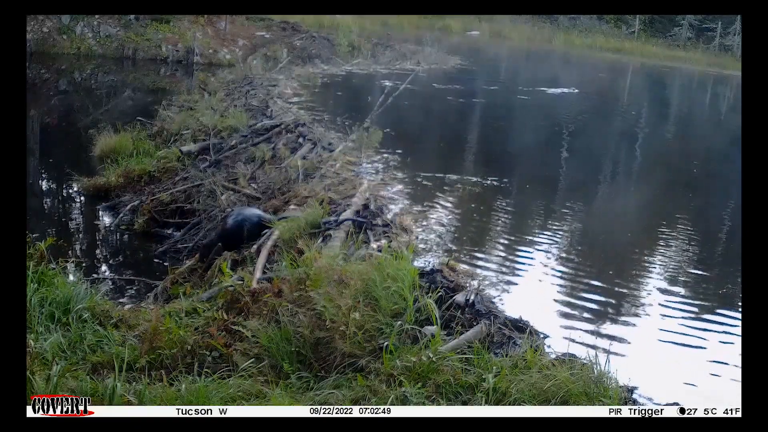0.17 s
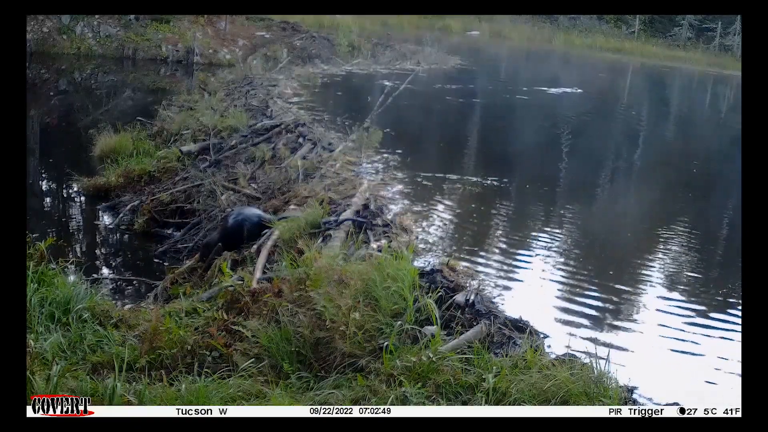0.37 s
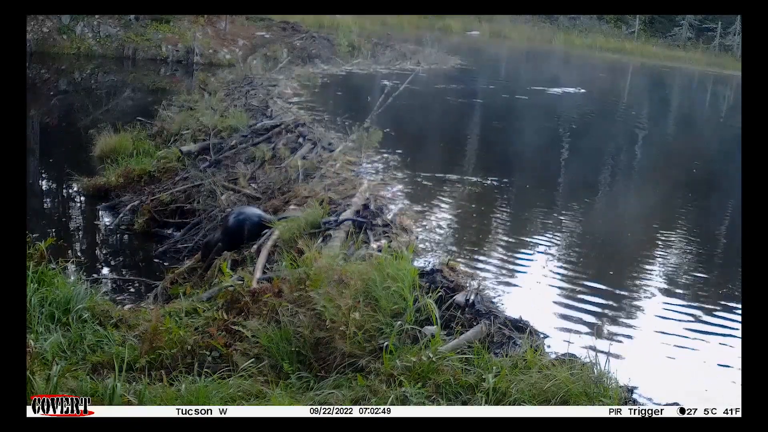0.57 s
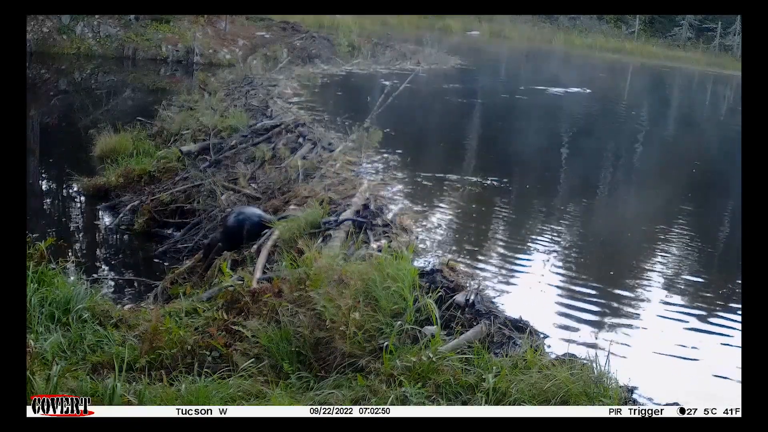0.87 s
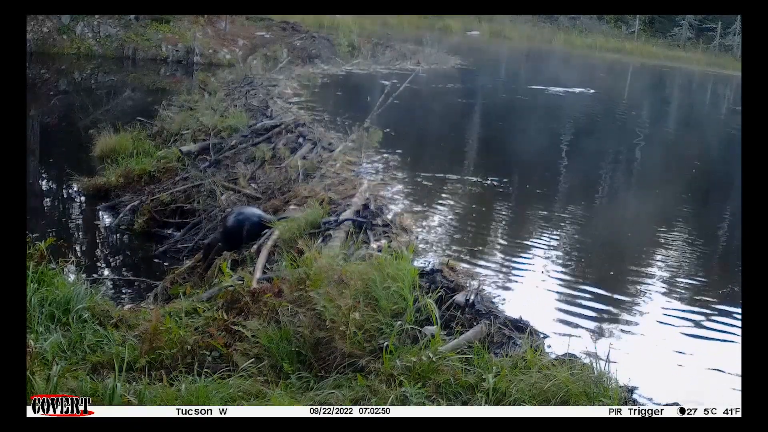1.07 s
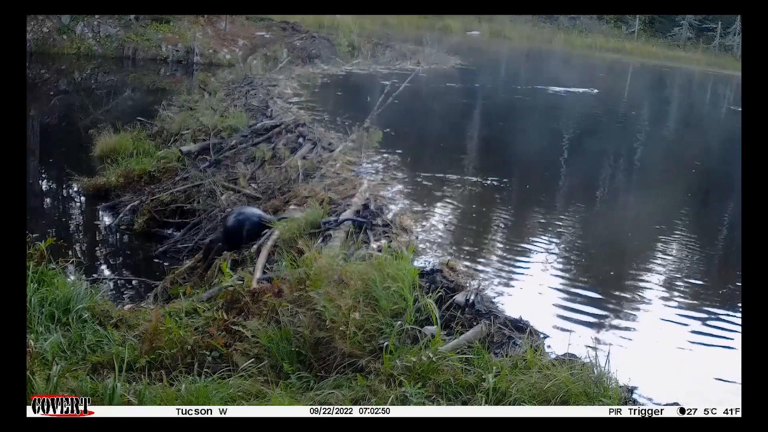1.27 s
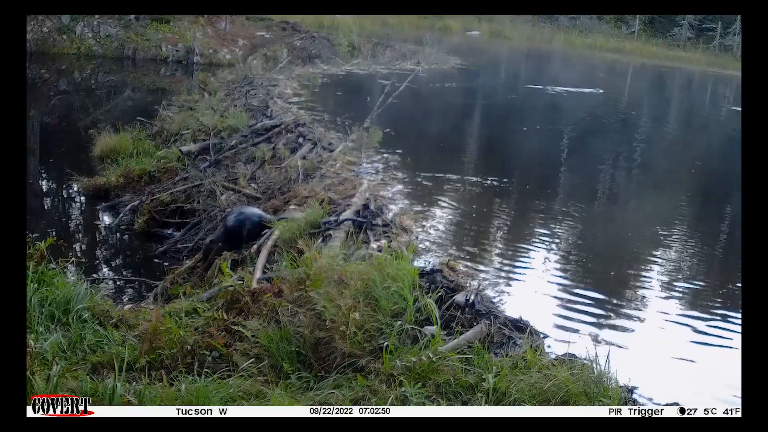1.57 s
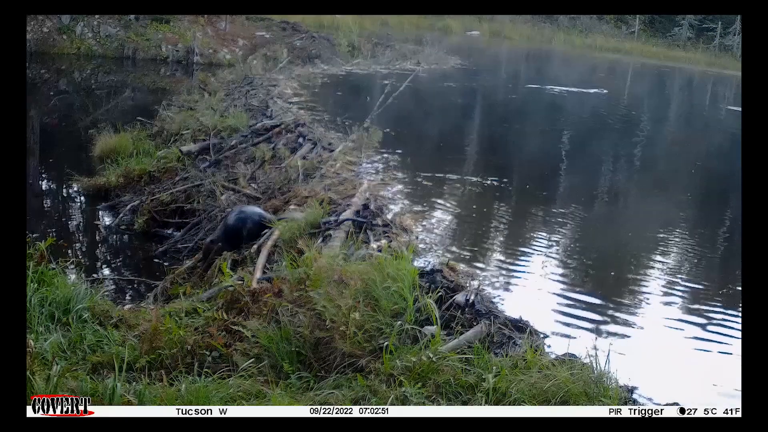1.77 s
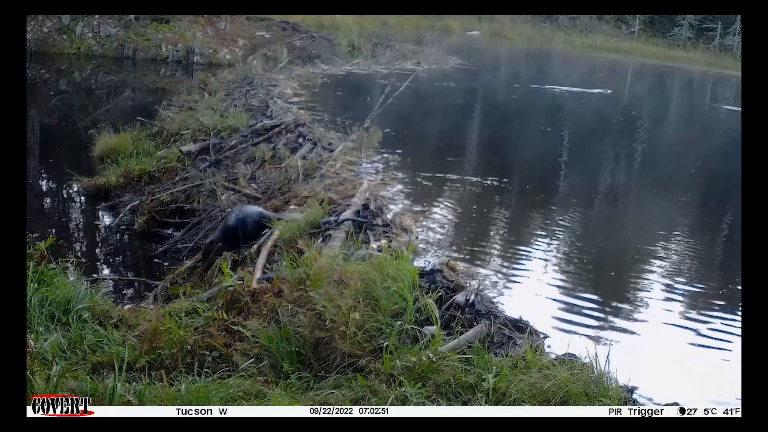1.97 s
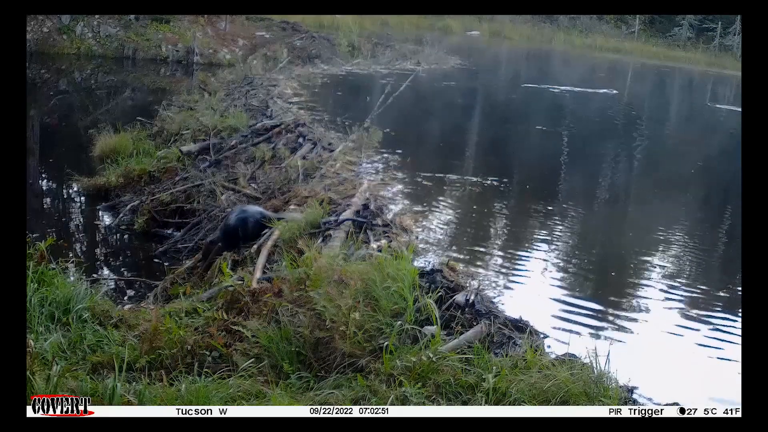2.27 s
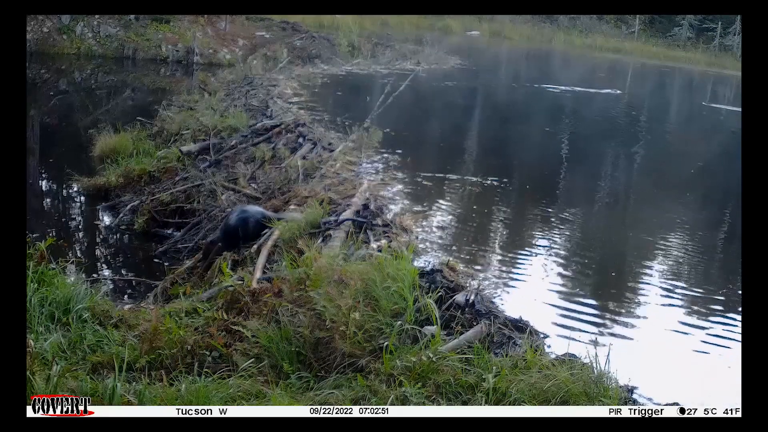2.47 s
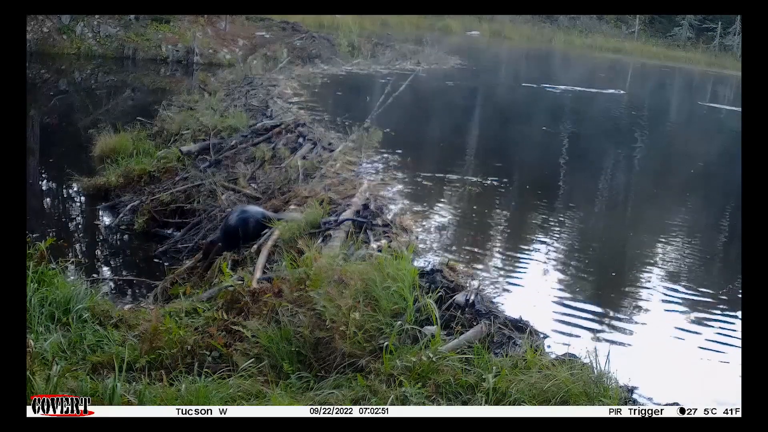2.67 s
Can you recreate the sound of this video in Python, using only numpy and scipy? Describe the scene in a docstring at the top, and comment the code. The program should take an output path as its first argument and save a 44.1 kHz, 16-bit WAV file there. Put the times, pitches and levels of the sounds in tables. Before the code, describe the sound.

Outdoor pond, fixed microphone with low uneven rumble and faint hiss. A rapid chirping animal rattle softens and stops, far geese call, a nearby goose croaks then honks loudly, its echo trailing through trees.

```python
"""Geese on a pond ringed by forest, over a low rumble (filtered noise) and even hiss.
A faint two-sine note fades at first; an animal's rattle of rising chirps (gliding partials) runs over it.
Far geese call, then a near goose gives a low creaky honk that breaks upward, a faint grunt and a loud
clear honk; another answers from afar, and a last soft chirp follows. Each voice is pulses filtered by a
throat; the banks return distinct echoes and the trees a long scattered one (decaying noise)."""
import sys
import numpy as np
from scipy import signal
from scipy.fft import rfft, irfft
from scipy.io import wavfile

SR = 44100
rng = np.random.default_rng(int(sys.argv[2]) if len(sys.argv) > 2 else 0)


def wav_out(sig):
    """Save sig, one row per channel (or a flat mono array), as 16-bit PCM at SR to the path in sys.argv[1]."""
    wavfile.write(sys.argv[1], SR, np.round(np.clip(np.atleast_2d(sig).T, -1, 1) * 32767).astype(np.int16))


N = 123480


def amp(db):
    """Logarithmic level: decibels to amplitude ratio."""
    return 10 ** (np.asarray(db) / 20)


def unit(x):
    """Normalisation: scales a signal to an rms of 1."""
    return x / np.sqrt(np.mean(x ** 2) + 1e-20)


def read(points, hz):
    """Logarithmic frequency: interpolates a curve on a log-frequency axis."""
    point_hz, value = np.transpose(points)
    return np.interp(np.log(hz + 1), np.log(point_hz + 1), value)


def add(mix, s, sound):
    """Superposition: adds a sound to the mix, in place, at time s."""
    part = mix[max(round(s * SR), 0):][:len(sound)]
    part += sound[:len(part)]


def colour(x, points):
    """Linear filtering: multiplies the spectrum of x by gains of (frequency [Hz], gain [dB])."""
    hz = np.fft.rfftfreq(len(x), 1 / SR)
    return irfft(rfft(x) * amp(read(points, hz)), len(x))


def wander(size, hz):
    """Band-limited randomness: smooth noise up to about hz, for at most one second."""
    f = np.fft.rfftfreq(SR, 1 / SR)
    lowpass = np.exp(-(f / hz) ** 2)
    return unit(irfft(rfft(rng.standard_normal(SR)) * lowpass))[:size]


# spectrum shape of the rumble: (frequency [Hz], relative density [dB])
RUMBLE_SPECTRUM = [(10, -37.5), (30, 3.5), (60, -0.5), (110, -3), (160, -3.5), (200, -10), (250, -23),
                   (330, -32), (500, -41.5), (1000, -58)]
# swelling and sinking of the rumble: (time [s], level [dB])
RUMBLE_LEVEL = [(0, -46.5), (.17, -48.5), (.24, -43.5), (.42, -41.5), (.5, -34.5), (.68, -39.5),
                (.77, -33.5), (.84, -40), (1.18, -40), (1.5, -44.5), (1.72, -42), (1.95, -44.5),
                (2.22, -38), (2.31, -43), (2.42, -35), (2.6, -41.5)]
# spectrum shape of the microphone's hiss: (frequency [Hz], relative density [dB])
HISS_SPECTRUM = [(30, -38), (250, 14), (400, 13), (650, 9), (950, 16), (1500, 4.5), (2500, 4), (4000, 5.5),
                 (5000, 0.5), (6000, 0.5), (15000, -2)]
HISS_DB = -61


def background():
    """Stationary and modulated noise: even hiss plus a low rumble whose level varies."""
    level_db = np.interp(np.arange(N) / SR, *np.transpose(RUMBLE_LEVEL))
    rumble = amp(level_db) * unit(colour(rng.standard_normal(N), RUMBLE_SPECTRUM))
    hiss = amp(HISS_DB) * unit(colour(rng.standard_normal(N), HISS_SPECTRUM))
    return rumble + hiss


NOTE_HZ, NOTE_DB = 1283, -54.5
UPPER_HZ, UPPER_DB = 1960, -17  # level relative to the lower partial
FADE_DB_PER_S, FADE_DB_PER_S2 = 29, 27  # initial fade rate; its quadratic steepening


def far_note():
    """Modulated sinusoids: two partials waver in amplitude and phase as they die away."""
    t, out = np.arange(SR) / SR, np.zeros(N)
    for hz, db in ((NOTE_HZ, 0), (UPPER_HZ, UPPER_DB)):
        waver = 1 + .25 * wander(SR, 35)
        note = waver * np.sin(2 * np.pi * hz * t + .6 * wander(SR, 35))
        level_db = NOTE_DB + db - FADE_DB_PER_S * t - FADE_DB_PER_S2 * t ** 2
        add(out, 0, unit(note) * amp(level_db))
    return out


def tail(t60s, build_s):
    """Exponential decay: diffuse noise builds up while each band loses 60 dB in its own T60."""
    hz, t, noise = signal.stft(rng.standard_normal(2 * SR), SR, nperseg=256)
    build = 1 - np.exp(-t / build_s)
    decay = amp(-60 * t / read(t60s, hz)[:, None])
    out = signal.istft(noise * build * decay, SR, nperseg=256)[1]
    return out / np.linalg.norm(out)


# gain of trees and of the nearest bank, which return the treble best: (frequency [Hz], gain [dB])
BRIGHT = (1300, 0), (1800, 9)


def scatter(x, t60s, build_s):
    """Diffuse reflection: trees and brush return a brightened sound convolved with a noise tail."""
    return signal.fftconvolve(colour(x, BRIGHT), tail(t60s, build_s))[:N]


# distinct echoes from the banks: (delay [s], level [dB])
BANK_ECHOES = [(0.201, -30), (0.341, -29.5), (.52, -30.5), (.98, -42.5)]


def banks(x):
    """Specular reflection: delayed, weaker copies from the shore, the nearest one brightest."""
    out = np.zeros(N)
    for k, (delay, db) in enumerate(BANK_ECHOES):
        returned = colour(x, BRIGHT) if k == 0 else x
        add(out, delay, amp(db) * returned)
    return out


TREBLE_HZ = 1800  # above it the voice shimmers and rasps
VOICE_JITTER, ROUGH_JITTER = .0015, .025  # rms pitch deviation as a share: always; more at full roughness
LOW_LAG, CREAK_SWING = 4.36, 0.48  # phase lag per log partial number; bunching in threes [rad]
SHIMMER_DB, SHIMMER_HZ = 2, 70


def throat_response(throat):
    """Minimum-phase resonance: the throat's impulse response follows from its gain alone."""
    f = abs(np.fft.fftfreq(4096, 1 / SR))
    log_gain = np.log(amp(read(throat, f)))
    return np.fft.ifft(np.exp(np.conj(signal.hilbert(log_gain)))).real


def honk(curve, throat):
    """Source-filter voice: pulses and breath noise drive a throat; creak favours every third pulse."""
    times, *columns = np.transpose(curve)
    t = np.arange(times[0], times[-1], 1 / SR)
    hz, db, treble_db, creak, rough = (np.interp(t, times, c) for c in columns)
    hz = hz * (1 + (VOICE_JITTER + ROUGH_JITTER * rough) * wander(len(t), 280))
    phase = 2 * np.pi * np.cumsum(hz) / SR
    cycle = (phase + 2 * np.pi) / 3  # one turn per three pulses
    phase = phase + CREAK_SWING * creak * np.sin(cycle)

    pulses = np.zeros(len(t))
    for k in range(1, int(8000 / hz.mean())):
        partial = np.cos(k * phase - LOW_LAG * np.log(k))
        if k * hz.mean() > TREBLE_HZ:
            partial = partial * amp(SHIMMER_DB * wander(len(t), SHIMMER_HZ))
        pulses += partial
    air = colour(rng.standard_normal(SR), [(900, 0.73), (2200, 12.4)])[:len(t)]
    drive = unit(pulses) + rough * air
    voice = unit(signal.fftconvolve(drive, throat_response(throat))[:len(t)])

    low = signal.sosfiltfilt(signal.butter(4, TREBLE_HZ, fs=SR, output="sos"), voice)
    treble = amp(treble_db) * (voice - low)
    rasp = 1 + 2 * creak * np.maximum(np.cos(cycle), 0) + rough * wander(len(t), 560)
    ends = np.minimum(1, np.minimum(t - t[0], t[-1] - t) / 0.00098)  # about 1 ms ramps
    out = np.zeros(N)
    add(out, t[0], (low + rasp * treble) * amp(db) * ends)
    return out


def far_honk(curve, throat, creak, rough):
    """Source-filter voice held steady: a distant call with even creak and roughness."""
    return honk([(s, hz, db, 0, creak, rough) for s, hz, db in curve], throat)


# earlier distant calls, one curve each: (time [s], pitch [Hz], level [dB])
FAR_CALLS = [
    [(1.03, 150, -61), (1.2, 182.4, -51.5)],
    [(1.196, 327.4, -45), (1.211, 338.6, -39), (1.238, 326, -44), (1.268, 308.6, -51.5)],
]
# resonances of their throats: (frequency [Hz], gain [dB])
FAR_THROAT = [(160, -36), (490, -2), (680, -8), (820, 8), (990, 11.5), (1150, 14), (1320, 9.5), (1550, -17),
              (2100, -24), (6000, -38)]
# the later answer: (time [s], pitch [Hz], level [dB])
ANSWER = [(1.899, 179.2, -52), (1.906, 177.3, -39.5), (1.94, 166.8, -43), (1.976, 160, -56)]
# resonances of its throat: (frequency [Hz], gain [dB])
ANSWER_THROAT = [(170, -60), (600, -10.5), (800, -30), (1040, 0), (1210, 9), (1420, -29), (1650, -24),
                 (2000, -14.5), (2800, -67), (6000, -39)]


def far_geese():
    """Superposed distant voices: the earlier calls creak, the later answer does not."""
    calls = sum(far_honk(call, FAR_THROAT, creak=.3, rough=.3) for call in FAR_CALLS)
    return calls + far_honk(ANSWER, ANSWER_THROAT, creak=0, rough=.15)


CHIRP_PEAK, CHIRP_JITTER = 0.67, 0.0043  # envelope peak as a share of length; rms pitch deviation as a share
SWEEP_CURVE = 2.025  # exponent of the pitch rise
# resonances that lift each chirp's second and third partials
OVERTONE_HZ, OVERTONE_WIDTH_HZ = (1963, 3294), 118


def chirp(peak_s, db, length, hz, rise, partials_db, shape):
    """Frequency modulation: pitch climbs ever faster under a slow swell and a quicker close."""
    u = np.arange(0, length, 1 / SR) / length
    pitch = hz * (1 + rise * u ** SWEEP_CURVE) * (1 + CHIRP_JITTER * wander(len(u), 401))
    phase = 2 * np.pi * (np.cumsum(pitch) / SR + rng.random())
    ramp = np.interp(u, [0, CHIRP_PEAK, 1], [0, 1, 0])
    swell = np.sin(np.pi / 2 * ramp) ** shape
    gains = [1]
    for k, resonance_hz in enumerate(OVERTONE_HZ, 2):
        gains.append(1 / np.hypot(1, (k * pitch - resonance_hz) / OVERTONE_WIDTH_HZ))
    tone = sum(amp(d) * gains[k] * np.sin((k + 1) * phase) for k, d in enumerate(partials_db))
    return peak_s - CHIRP_PEAK * length, np.sqrt(2) * amp(db) * swell * tone


# loud chirps at their peaks: (time [s], level before partial gains [dB])
LOUD_CHIRPS = [(0.2108, -35), (.254, -35.5), (0.2969, -35.5), (0.342, -35.5), (0.3846, -35), (0.4305, -35),
               (0.4769, -34.5), (0.522, -34.5), (0.568, -35), (0.6103, -35), (0.659, -34.5)]
# soft chirps at their peaks: (time [s], level before partial gains [dB])
SOFT_CHIRPS = [(0.696, -44.5), (0.742, -44.5), (.7928, -43), (0.844, -42), (.8962, -43.5), (0.9499, -43.5),
               (1.0007, -43), (1.052, -42.5), (1.105, -43), (1.1595, -43), (1.2146, -43.5), (1.2663, -43.5),
               (1.321, -43.5), (2.791, -56)]
# gains of partials 1 to 3 before resonance: (gain [dB])
LOUD_PARTIALS_DB = [-1, -7.5, -24]
# the same for soft chirps: (gain [dB])
SOFT_PARTIALS_DB = [-4.5, -0.5, -19.5]
LOUD_SHAPE, SOFT_SHAPE = 0.82, 0.72  # envelope exponents
# starting pitch, rise as a share of it, length
LOUD_HZ, LOUD_RISE, LOUD_S = 924.6, 0.38, 0.021
SOFT_HZ, SOFT_RISE, SOFT_S = 902.2, 0.299, .02
PURE_RISE, SHORT_S = 0.12, 0.01  # rise of every one-partial chirp; length of the opener and leads
FIRST_S, FIRST_DB, FIRST_HZ = .165, -36.5, 1039  # the single opener
LEAD_HZ, LEAD_ADVANCE_S, LEAD_DB = 1827, 0.0078, -47  # a short overtone opens each loud chirp
SQUEAK_HZ, SQUEAK_DELAY_S, SQUEAK_S, SQUEAK_DB = 2039, .0125, 0.016, -46


def rattle():
    """Pulse train: about twenty chirps a second, loud with squeaks between, then softer and thinner."""
    out = np.zeros(N)
    add(out, *chirp(FIRST_S, FIRST_DB, SHORT_S, FIRST_HZ, PURE_RISE, [0], LOUD_SHAPE))
    for s, db in LOUD_CHIRPS:
        add(out, *chirp(s - LEAD_ADVANCE_S, LEAD_DB, SHORT_S, LEAD_HZ, PURE_RISE, [0], SOFT_SHAPE))
        add(out, *chirp(s, db, LOUD_S, LOUD_HZ, LOUD_RISE, LOUD_PARTIALS_DB, LOUD_SHAPE))
        add(out, *chirp(s + SQUEAK_DELAY_S, SQUEAK_DB, SQUEAK_S, SQUEAK_HZ, PURE_RISE, [0], LOUD_SHAPE))
    for s, db in SOFT_CHIRPS:
        add(out, *chirp(s, db, SOFT_S, SOFT_HZ, SOFT_RISE, SOFT_PARTIALS_DB, SOFT_SHAPE))
    return out


# The four curves: (time [s], pitch [Hz], level [dB], treble gain [dB], creak [0-1], roughness [0-1])
# low creaky honk, same columns
LOW_HONK = [(1.482, 300.8, -52, -13, 0.53, 0.1), (1.495, 301, -41.5, -11, 0.3, 0.1),
            (1.515, 309, -39, -9, 0.21, 0.3), (1.54, 308, -38.5, -5.5, 1, 0.1),
            (1.558, 319, -38, -8, 0.95, 0.31), (1.567, 310, -51, -4, 0.8, 0.5)]
# the voice breaks upward and falls away, same columns
BREAK = [(1.562, 469, -65, 19.5, 0.0039, 0.19), (1.569, 408, -35.5, -16, 0, 0.43),
         (1.579, 433.3, -39, -5.5, 0, .25), (1.594, 396, -48, -3.5, 0.0048, 0.39),
         (1.628, 355, -50, -15, 0, 0.4)]
# a faint rough grunt ends it, same columns
GRUNT = [(1.625, 286, -53, -13.5, 0.5, .7), (1.649, 293.4, -51.5, -24, 0.71, .7),
         (1.702, 279.4, -54, -30, 1, 0.45)]
# resonances of the throat in these three: (frequency [Hz], gain [dB])
LOW_THROAT = [(305, -5.5), (450, -10), (615, -4), (780, 3), (920, 7.5), (1060, -10), (1250, -5.5),
              (1650, -21.5), (2100, -7), (2500, -13), (4000, -13), (5500, -40), (7000, -37)]
# loud clear honk, same columns
LOUD_HONK = [(1.709, 465, -42, -10.5, 0.076, .1), (1.713, 428.4, -32, 4.5, 0, 0.051),
             (1.742, 447.2, -23.5, -2, 0.014, 0.012), (1.776, 452, -27.5, 6, 0.02, 0.17),
             (1.8, 446.5, -25.5, -1, 0.074, 0.41), (1.809, 423, -30.5, -1.5, 0.066, 0.37),
             (1.835, 467, -45.5, 3, 0, 0.22)]
# resonances of the throat in the loud honk: (frequency [Hz], gain [dB])
LOUD_THROAT = [(445, -23), (850, 3.5), (920, 7.5), (1340, -19), (1780, -33.5), (2230, -26.5), (2680, -23.5),
               (3570, -19), (4460, -25.5), (4900, -30), (5350, -42.5), (6300, -46), (8000, -95)]


def near_goose():
    """Source-filter voice in two throat postures: low honk, break and grunt, then the loud honk."""
    low_call = sum(honk(part, LOW_THROAT) for part in (LOW_HONK, BREAK, GRUNT))
    return low_call + honk(LOUD_HONK, LOUD_THROAT)


# reverberation time of the forest: (frequency [Hz], T60 [s])
FOREST_T60 = [(900, 1.84), (2000, 1.87), (4000, 0.73)]
FOREST_BUILD_S, GOOSE_WET_DB, OTHERS_WET_DB = 0.053, -26, -21.5
NEAR_T60_S, NEAR_BUILD_S, NEAR_DB = 0.086, 0.0066, -13.5  # short scattering of the rattle


def scene():
    """Superposition: direct sounds, their reflections and the background add linearly."""
    floor, chirps = background(), rattle()
    goose, far = near_goose(), far_geese()
    near = amp(NEAR_DB) * scatter(chirps, [(1000, NEAR_T60_S)], NEAR_BUILD_S)
    into_forest = amp(GOOSE_WET_DB) * goose + amp(OTHERS_WET_DB) * (chirps + far)
    forest = scatter(into_forest, FOREST_T60, FOREST_BUILD_S)
    return (floor + far_note() + far + chirps + near + goose + banks(goose) + forest)[None]


def record(dry):
    """Band limitation: a linear-phase low-pass sets the recorder's upper edge."""
    lowpass = signal.firwin(511, 15700, window=("kaiser", 9), fs=SR)  # edge in Hz
    return signal.oaconvolve(dry, lowpass[None], "same")


dry = scene()
out = record(dry)
wav_out(out)
```